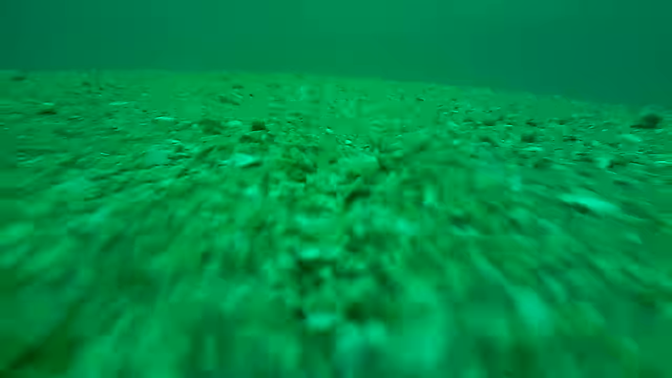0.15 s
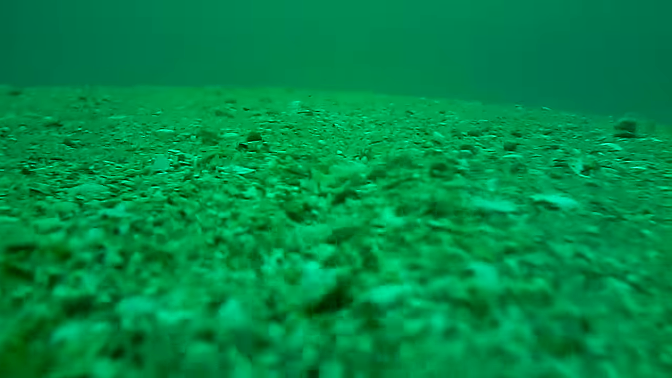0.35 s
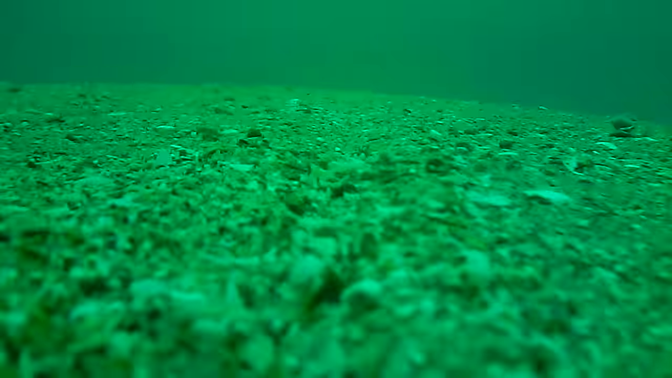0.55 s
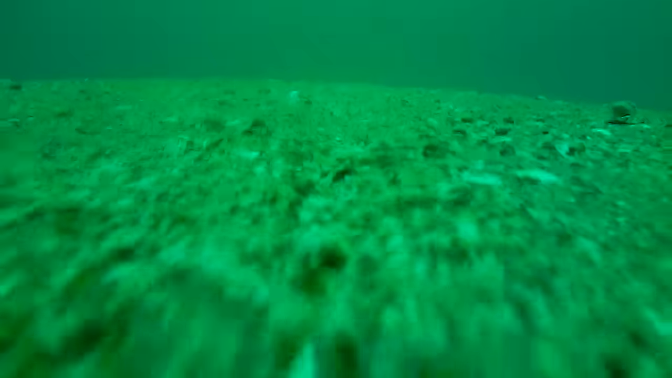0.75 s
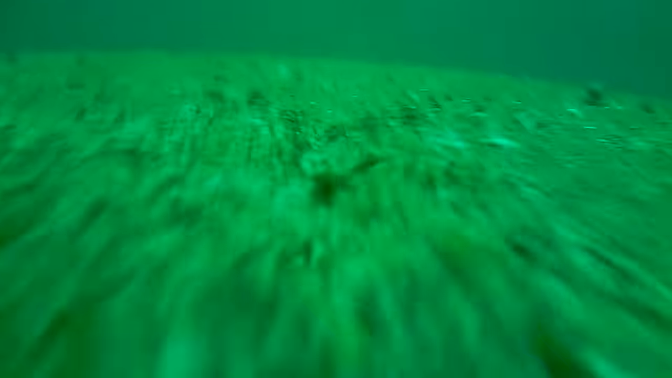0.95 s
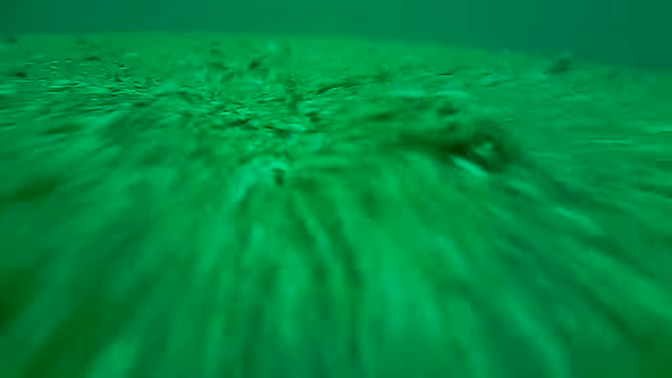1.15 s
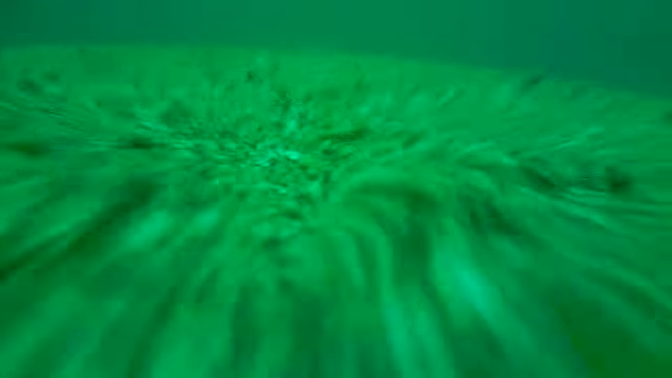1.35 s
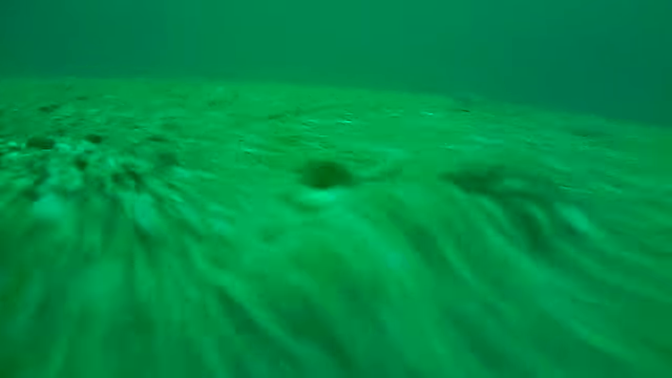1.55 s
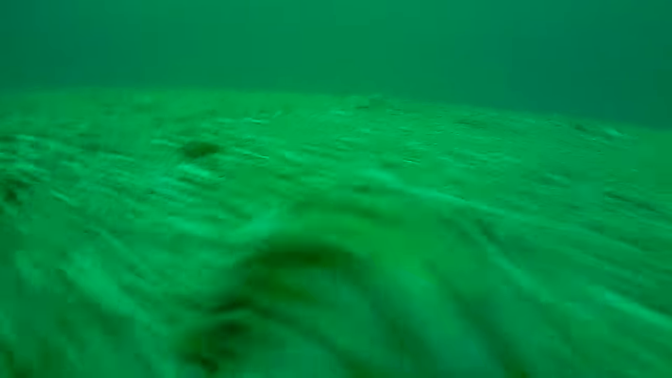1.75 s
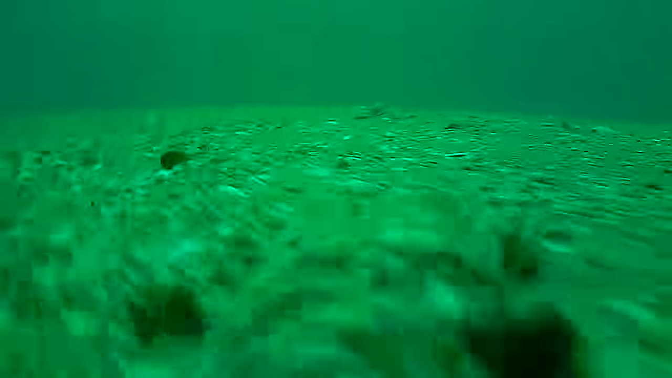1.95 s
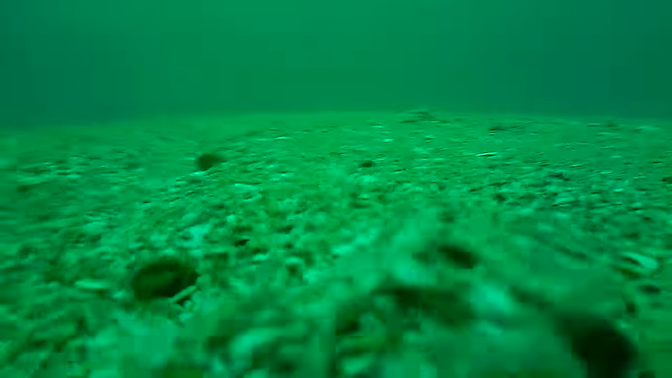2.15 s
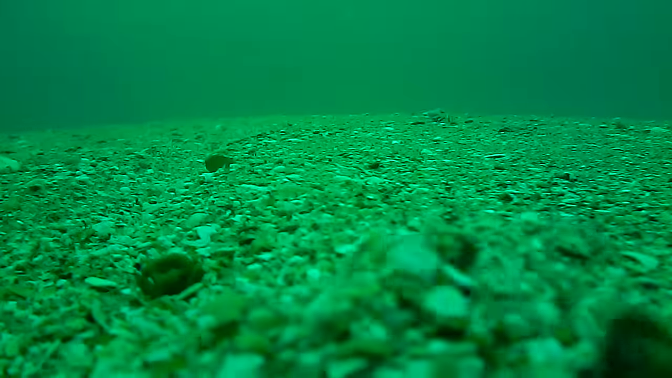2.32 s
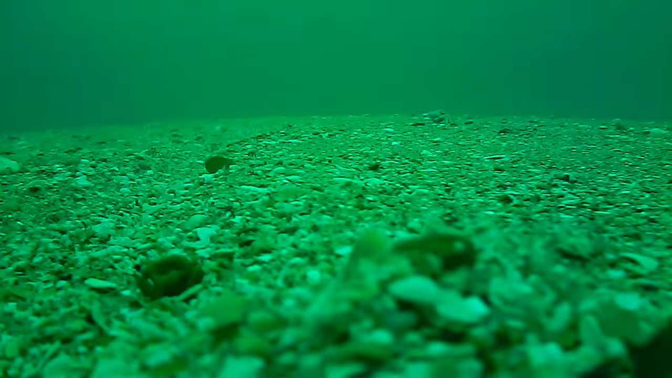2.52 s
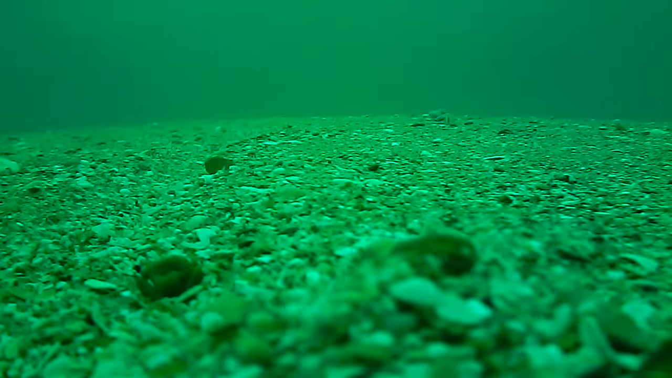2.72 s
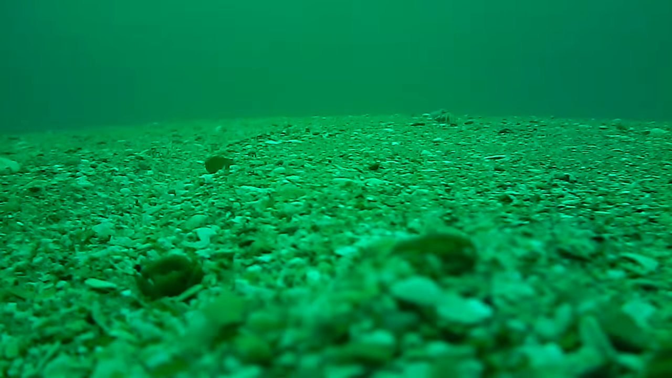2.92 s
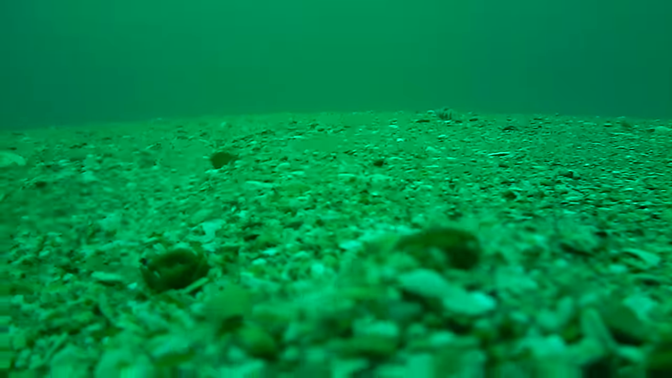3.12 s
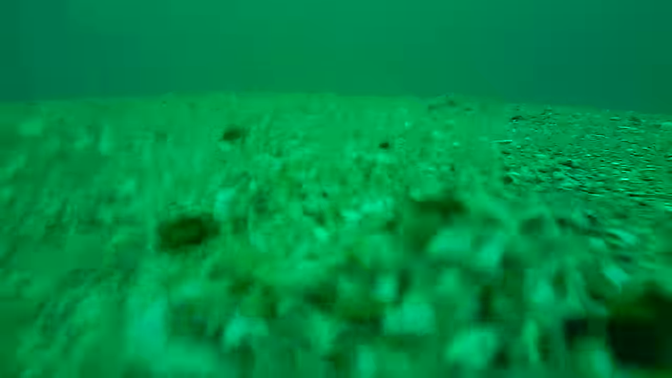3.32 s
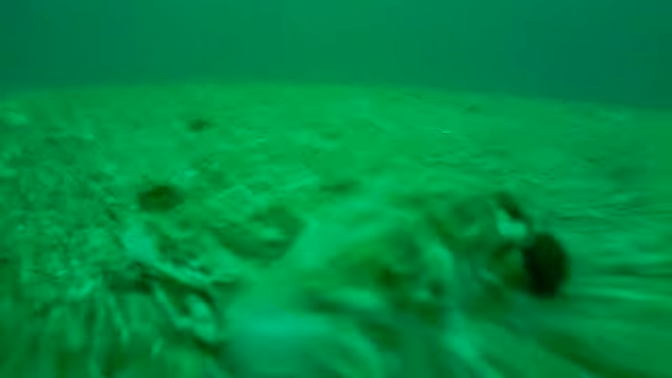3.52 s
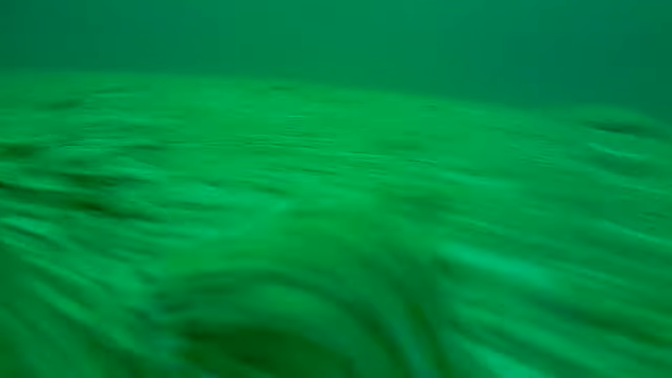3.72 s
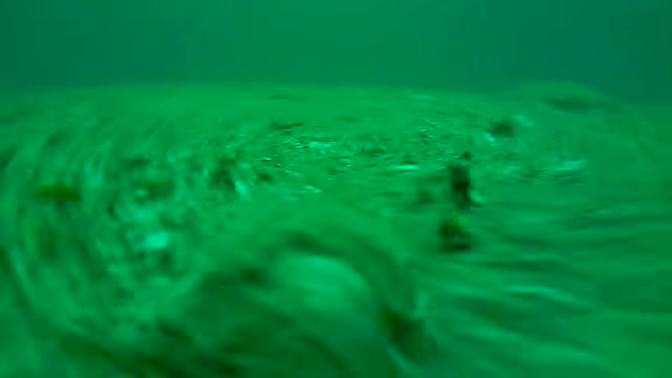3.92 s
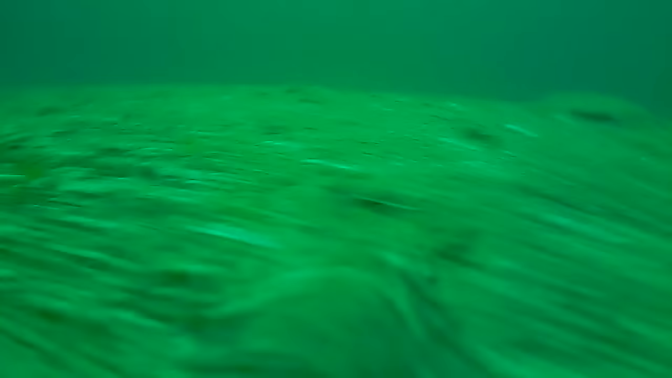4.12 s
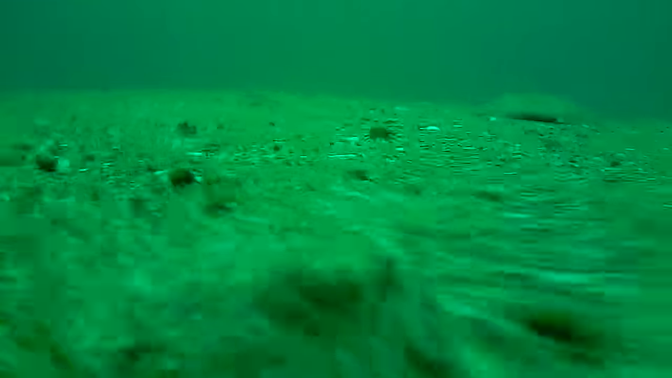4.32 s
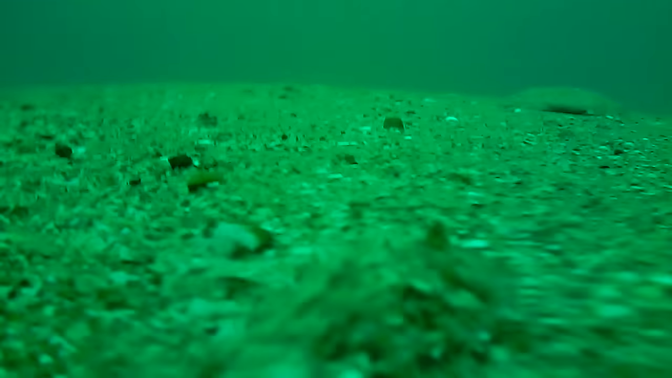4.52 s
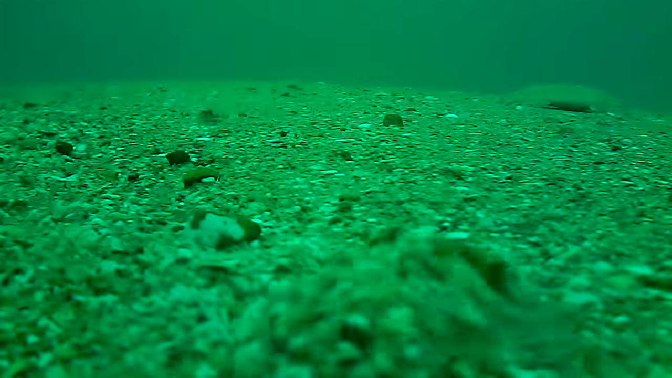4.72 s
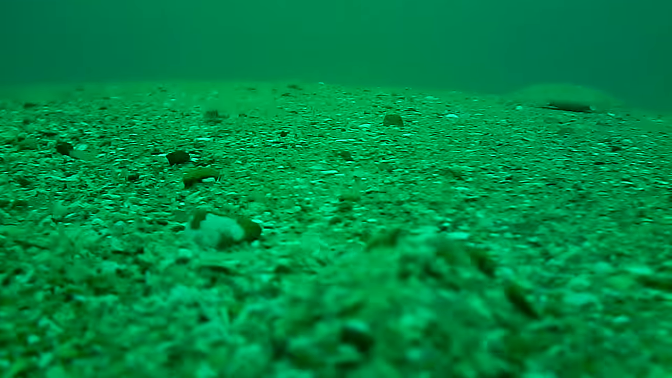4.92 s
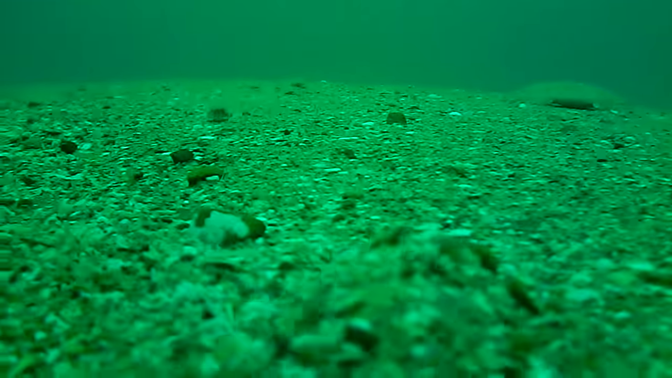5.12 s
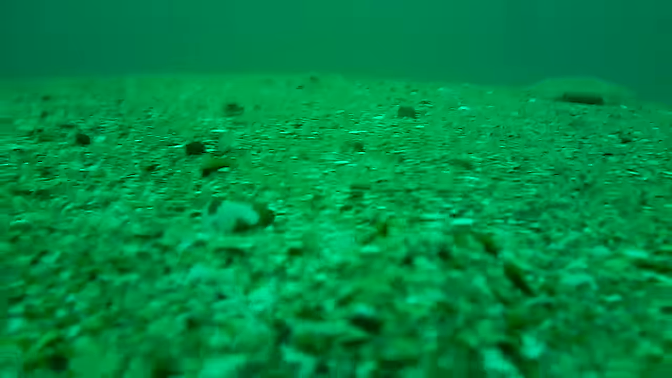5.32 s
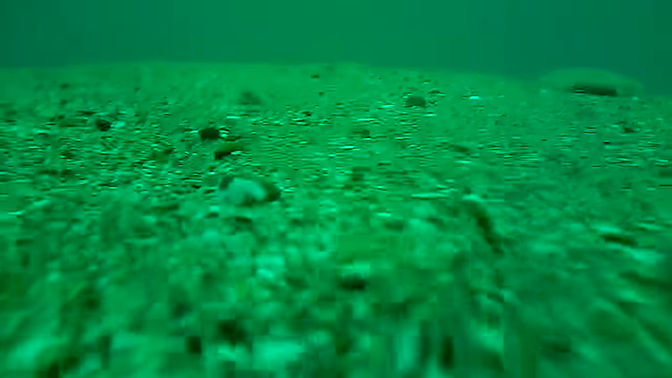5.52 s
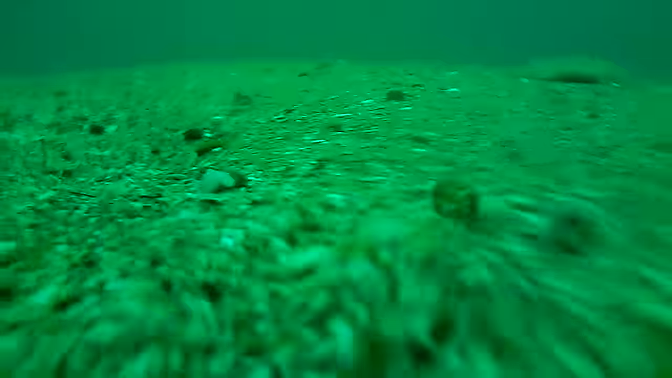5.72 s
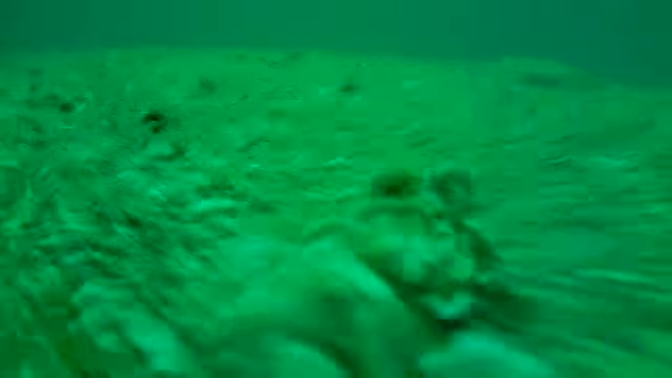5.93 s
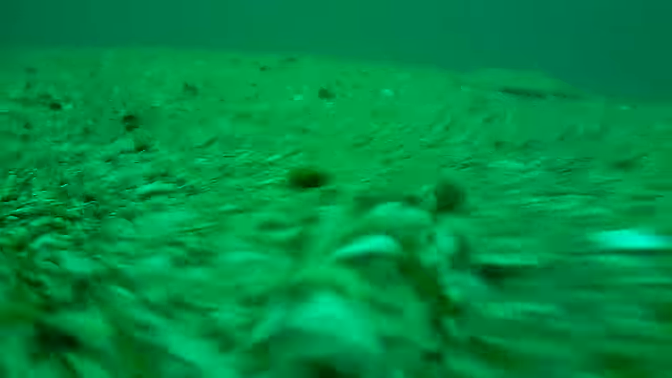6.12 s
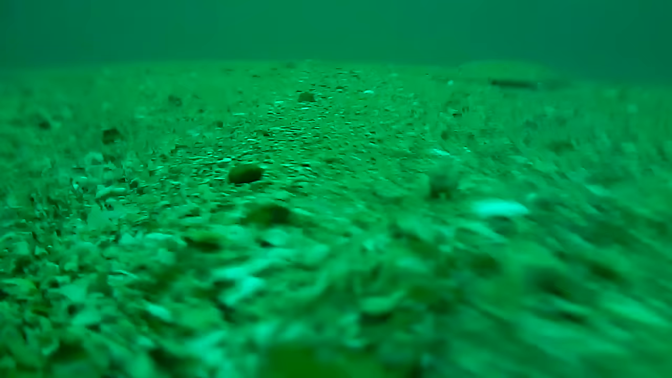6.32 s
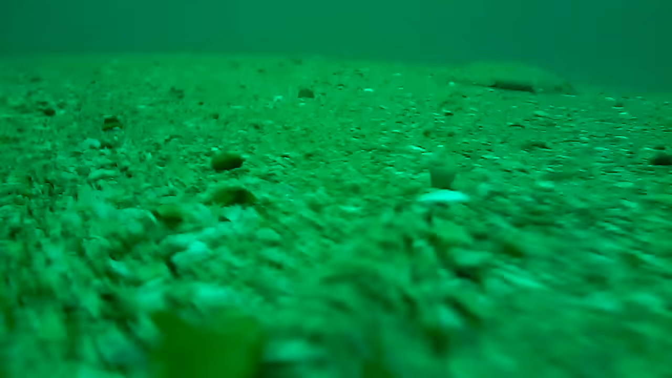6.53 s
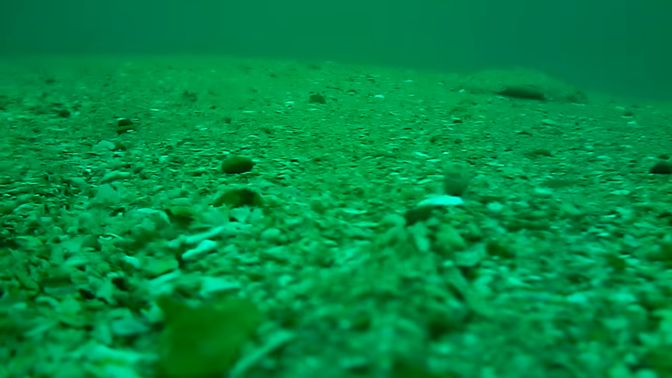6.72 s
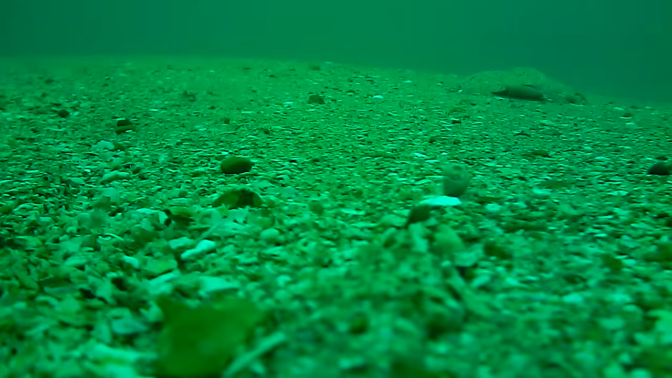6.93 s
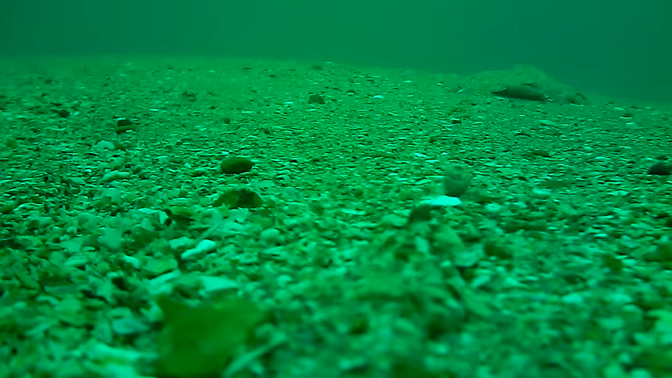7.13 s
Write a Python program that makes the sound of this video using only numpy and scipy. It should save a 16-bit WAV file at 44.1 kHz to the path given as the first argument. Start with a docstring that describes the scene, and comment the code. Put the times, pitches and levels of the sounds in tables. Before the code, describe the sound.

On a seabed, a hard waterproof case grinds over shingle and broken shell, heard from inside. A fading scrape opens, then a long crunchy surge, a quiet pause, a second rough surge with heavy bumps, another short pause, and a slightly softer drag. Pebbles clack, shell chips crack and grit hisses; the rests leave a low wavering drone, faint hiss and small ticks.

```python
"""Grinding is under way at once: a waterproof camera housing dragged over a seabed of shingle and shell.
Surges and short nudges, some overlapping, swell and ebb as powers of half a sine.
Random clicks of pebbles, shell and grit ring the case resonances; chips crack, stones clack, clumps crunch.
Larger stones judder and bump the case, as low-passed knocks and decaying sines.
In the pauses a wavering low drone, a faint hiss and a few settling ticks remain."""
import sys
import numpy as np
from scipy import signal
from scipy.fft import rfft, irfft, next_fast_len
from scipy.io import wavfile
from scipy.ndimage import uniform_filter1d

SR = 44100
rng = np.random.default_rng(int(sys.argv[2]) if len(sys.argv) > 2 else 0)


def int16_out(signal):
    """Quantize to a 16-bit WAV file."""
    q = np.round(np.clip(np.atleast_2d(signal).T, -1, 1) * 32767)
    wavfile.write(sys.argv[1], SR, q.astype(np.int16))


N = 320147
TIME = np.arange(N) / SR
FREQ = np.maximum(np.arange(N // 2 + 1) * SR / N, 1)


def undb(db):
    """Decibels to gain."""
    return np.exp(np.asarray(db) * (np.log(10) / 20))


def unit(x):
    """Scale to an rms of one."""
    return x / np.sqrt(np.mean(x ** 2) + 1e-18)


def band(x, lo_hz, hi_hz, order=2):
    """Butterworth band-pass."""
    edges_hz = [lo_hz, min(hi_hz, SR / 2 - 10)]
    return signal.sosfilt(signal.butter(order, edges_hz, "band", fs=SR, output="sos"), x)


def bell(f, hz, q):
    """Gain of a resonance, one at its centre; q of zero is flat."""
    return 1 / (1 + (q * (f / hz - hz / f)) ** 2)


def walk(rate_hz):
    """Smoothed random steps, unit rms, with rate_hz new values per second."""
    step = max(int(SR / rate_hz), 2)
    stairs = np.repeat(rng.standard_normal(N // step + 1), step)
    return unit(uniform_filter1d(stairs, step)[:N])


def noise(gain):
    """Noise of unit rms with the given gain at each frequency."""
    return unit(irfft(rfft(rng.standard_normal(N)) * gain, N))


def add(out, at_s, sound):
    """Mix a sound in at a time."""
    start = max(int(at_s * SR), 0)
    out[start:start + len(sound)] += sound[:N - start]


# The water shoves the case along, from rest to rest.
# Each row: start in seconds, end in seconds, grind at full speed in dB before the bed acts, exponent of
# the swell, fine grit in dB, broken shell in dB, extra knocking in dB.
SURGE_ROWS = [(-0.5, 0.48, -31.8, 2.3, 2.6, -3.2, -0.6), (-0.15, 0.78, -46.8, 1.05, 1.4, -1.8, -0.7),
              (0.51, 2.255, -31.7, 0.85, 2.9, -1.4, -1.6), (2.98, 3.42, -49.8, 1.25, 3.4, -1.4, -0.8),
              (3.215, 3.53, -35.2, 0.55, 1.1, 0.3, -3.2), (3.18, 4.705, -31, 0.88, 2.1, 0.1, 0.2),
              (5.0, 6.82, -35, 1.25, 3.1, 0.7, 1.4), (7.08, 7.4, -59.2, 1.05, -1.2, -0.7, 0.3)]


def sliding_db():
    """Speed follows half a sine per surge, grind a power of it; overlaps add power and blend colour."""
    power, colour = np.full(N, 1e-12), np.zeros((3, N))
    for start_s, end_s, db, steepness, *colour_db in SURGE_ROWS:
        moving = (TIME > start_s) & (TIME < end_s)
        speed = np.sin(np.pi * (TIME[moving] - start_s) / (end_s - start_s))
        share = (undb(db) * speed ** steepness) ** 2
        power[moving] += share
        colour[:, moving] += np.outer(colour_db, share)
    return 10 * np.log10(power), *(colour / power)


# Stretches of bed that the case ploughs through.
# Each row: middle in seconds, length in seconds, coarseness in dB (above 0 stones, below 0 fine grit).
BED_PATCHES = [(0.88, 0.3, -2.5), (1.85, 0.2, 3.2), (3.45, 0.6, -3.6), (3.87, 0.16, 6), (4.02, 0.3, 3.2),
               (4.5, 0.5, 2.7), (5.41, 0.2, 4.8), (5.62, 0.16, -3.2), (6.08, 0.2, 2.2), (6.64, 0.5, 4.2)]


def coarseness():
    """Coarseness of the bed in dB, easing into and out of each patch as a squared cosine."""
    total_db = np.zeros(N)
    for middle_s, length_s, db in BED_PATCHES:
        total_db += db * np.cos(np.pi * np.clip((TIME - middle_s) / length_s, -.5, .5)) ** 2
    return total_db


GRIT_DB_PER_LOAD_DB = 0.2863  # faster sliding breaks more fine grit
KNOCK_BASE_DB, KNOCK_DB_PER_LOAD_DB = -46.3, 0.4  # knocking grows more slowly than the grind
KNOCK_DB_PER_STONE_DB, GRIND_DB_PER_STONE_DB = 0.8, -0.2
BED_GRIND_DB, BED_GRIT_DB, BED_RATE_HZ = 0.5, 0.7, 22  # chance unevenness: rms spreads, changes per second


def drag_levels(brisk_db=-32):
    """Speed and bed set the grind, the grit and shell relative to it, and the knocking, all in dB."""
    slide_db, fine_db, broken_db, bumpy_db = sliding_db()
    load_db, stones_db = slide_db - brisk_db, coarseness()
    push_db = slide_db + GRIND_DB_PER_STONE_DB * stones_db + BED_GRIND_DB * walk(BED_RATE_HZ)
    grit_db = fine_db + GRIT_DB_PER_LOAD_DB * load_db - stones_db + BED_GRIT_DB * walk(BED_RATE_HZ)
    knock_db = KNOCK_BASE_DB + bumpy_db + KNOCK_DB_PER_LOAD_DB * load_db
    knock_db = knock_db + KNOCK_DB_PER_STONE_DB * np.maximum(stones_db, 0)
    return push_db, grit_db, broken_db, knock_db


# Resonances of the housing.
# Each row: centre in Hz, nominal width in Hz, level in dB.
CASE_MODES = [(473, 260, -13), (801, 130, 0.5), (1076, 190, -8), (1467, 312, -2), (2045, 215, -0.5),
              (2660, 500, -10.5), (3335, 340, -3.5), (3623, 270, -3.5), (5154, 450, -10.5),
              (6200, 2550, -14.5), (7700, 800, -6.5), (8850, 620, -8.5), (9900, 260, -11),
              (10750, 366, -5.5), (11660, 450, -15.5), (12400, 210, -13), (14500, 700, -26),
              (15300, 800, -15.5)]


def housing(hz=3000, q=0, size=2048, skirt=1.57, wall_db=-21):
    """Impulse response of the case to a click with its own pitch and sharpness."""
    f = np.maximum(np.arange(size // 2 + 1) * SR / size, 1)
    power = undb(wall_db) ** 2 * bell(f, 730, 0.24) ** 2  # the wall also passes sound directly
    for centre_hz, width_hz, db in CASE_MODES:
        power = power + undb(db) ** 2 * bell(f, centre_hz, 0.79 * centre_hz / width_hz) ** skirt
    cepstrum = irfft(np.log(np.sqrt(power) * bell(f, hz, q) + 1e-6))
    cepstrum[1:size // 2] *= 2  # minimum phase: sharp start, fading tail
    cepstrum[size // 2 + 1:] = 0
    return irfft(np.exp(rfft(cepstrum)))


def shifting_contact(x, depth_db=1.0, rate_hz=30):
    """The contact point wanders, so the bands around the case resonances swell and sink separately."""
    centres_hz = np.sort(np.array(CASE_MODES)[:, 0])
    padded = next_fast_len(N)
    spectrum = rfft(x, padded)
    freq = np.arange(len(spectrum)) * SR / padded
    out = np.zeros(N)
    for weights in np.eye(len(centres_hz)):
        part = irfft(spectrum * np.interp(freq, centres_hz, weights), padded)[:N]
        out += part * undb(depth_db * walk(rate_hz))
    return out


def clicks(rate_hz, spread_db):
    """Random contacts of either sign at a varying rate, with log-normal sizes capped above; unit rms."""
    count = len(rate_hz)
    share = np.clip(rate_hz / SR, 1e-4, 1)
    size = undb(spread_db * np.minimum(rng.standard_normal(count), 2.3)) * rng.choice([-1, 1], count)
    hit = rng.random(count) < share
    return unit(hit * size / np.sqrt(share))  # density leaves the mean power alone


def catches(rate_hz, release_s, limit=3):
    """Stones catch and let go: decaying jumps, soft-limited by what the loose bed can hold."""
    jumps = (rng.random(N) < rate_hz / SR) * np.sqrt(rng.exponential(size=N))
    stress = signal.lfilter([1], [1, -np.exp(-1 / (release_s * SR))], jumps)
    return unit(np.tanh(unit(stress - stress.mean()) / limit))


def grind(push_db, grit_db, broken_db):
    """Pebbles, shell and sand click in three bands; pushing adds contacts and slips modulate their level."""
    load_db = push_db + 32
    crowd = undb(.55 * load_db)
    slips = catches(rate_hz=170, release_s=0.0039)
    ring = housing()
    pebbles = clicks(3600 * crowd, spread_db=2) * undb(1.3 * slips + 0.55 * walk(60))
    pebbles = unit(band(signal.fftconvolve(pebbles, ring)[:N], 283, 2350, order=4))
    shell = clicks(4200 * crowd, spread_db=2.5) * undb(1.64 * slips)
    shell = unit(band(signal.fftconvolve(shell, ring)[:N], 2410, 5840, order=3))
    sand = clicks(6000 * crowd, spread_db=3.5) * undb(1.86 * slips + 0.69 * walk(90))
    sand = unit(band(signal.fftconvolve(sand, ring)[:N], 5900, 14700, order=3))
    # shell breaks under load; the finest grains follow the grit most strongly
    shell_db = broken_db + 0.64 * grit_db + 0.045 * load_db - 2.5
    sand_db = 1.17 * grit_db - 3.5
    mix = pebbles + undb(shell_db) * shell + undb(sand_db) * sand
    return undb(push_db) * shifting_contact(mix)


def crack(hz, q, rise_s=0.00023, splinter_s=0.001, size=176):
    """A chip splinters as a brief burst of random signs and rings the case; energy of unit rms over size."""
    age = TIME[:size]
    splinters = rng.choice([-1, 1], size) * (1 - np.exp(-age / rise_s)) * np.exp(-age / splinter_s)
    sound = signal.fftconvolve(splinters, housing(hz, q))
    return sound * np.sqrt(size / np.sum(sound ** 2))


def chips(push_db, grit_db, count=260, lo_hz=1200, hi_hz=11000, q=1.6, top_db=0, range_db=10):
    """Small chips crack at random times and pitches, as loud as the push; high ones follow the grit."""
    out = np.zeros(N)
    for when, fineness, weakness in rng.random((count, 3)):
        i = int(when * N)
        db = push_db[i] + fineness * grit_db[i] + top_db - range_db * weakness
        add(out, i / SR, undb(db) * crack(lo_hz * (hi_hz / lo_hz) ** fineness, q))
    return out


def loose_stones(push_db, count=320, lo_hz=800, hi_hz=4200, cycles=4, top_db=5.5, range_db=10, size=900):
    """Pebbles pushed aside clack together, each a sine decaying over a few cycles at its own pitch."""
    out, age = np.zeros(N), TIME[:size]
    for when, smallness, weakness in rng.random((count, 3)):
        i = int(when * N)
        hz = lo_hz * (hi_hz / lo_hz) ** smallness
        ring = np.sin(2 * np.pi * hz * age) * np.exp(-hz * age / cycles)
        add(out, i / SR, undb(push_db[i] + top_db - range_db * weakness) * ring)
    return out


def judder(knock_db):
    """Larger stones knock the whole case, and it rocks slowly over them: two bands of sparse clicks."""
    knocks = unit(band(clicks(np.full(N, 900), spread_db=3.5), 83, 543))
    rocking = unit(band(clicks(np.full(N, 300), spread_db=3), 7.1, 93.5))
    return undb(knock_db - 2.5) * knocks + undb(0.54 * knock_db - 20.5) * rocking


# Clumps giving way.
# Each row: start in seconds, length in seconds, level in dB before gain_db, centre in Hz.
CLUMPS = [(0.036, 0.012, -32, 1500), (0.768, 0.017, -31.5, 11000), (1.339, 0.037, -24.5, 11000),
          (1.359, 0.014, -21, 5860), (1.485, 0.041, -27, 2220), (1.768, 0.022, -28, 3400),
          (1.862, 0.032, -30, 3400), (1.975, 0.012, -30, 3400), (2.003, 0.0095, -25, 4000),
          (2.028, 0.035, -27.5, 3350), (3.191, 0.011, -30.5, 3100), (3.221, 0.0048, -25, 1120),
          (3.24, 0.008, -28, 3680), (3.451, 0.0083, -24, 11000), (3.622, 0.02, -23, 8000),
          (3.698, 0.027, -21.5, 6400), (3.909, 0.016, -27, 1090), (4.175, 0.035, -19.8, 1450),
          (4.246, 0.032, -23.5, 5370), (5.091, 0.012, -38.5, 1770), (5.144, 0.008, -41, 2600),
          (5.192, 0.022, -41, 1300), (5.899, 0.018, -29, 4500), (6.164, 0.0067, -26, 1400),
          (6.242, 0.037, -31, 5460), (6.492, 0.02, -35, 3300), (6.745, 0.045, -48.5, 700)]


def crunches(gain_db=-2.0, fade=0.43, q=0.23):
    """A clump collapses in a quick run of fractures that weakens slightly and rings the case."""
    out = np.zeros(N)
    for at_s, length_s, db, hz in CLUMPS:
        age = np.linspace(0, 1, max(int(length_s * SR), 20))
        run = clicks(np.full(len(age), 7000), spread_db=2.5) * np.exp(-fade * age)
        sound = signal.fftconvolve(run, housing(hz, q))
        add(out, at_s, sound * undb(db + gain_db) * np.sqrt(len(age) / np.sum(sound ** 2)))
    return out


# Single chips snapping or tapping the case, and ticks in the pauses.
# Each row: start in seconds, level in dB, centre in Hz, sharpness Q.
SINGLE_CHIPS = [(0.385, -47, 1310, 0.1), (0.4966, -43, 3650, 0.29), (0.8659, -28, 8000, 0.89),
                (1.3896, -27.5, 4750, 2.5), (1.3936, -17, 8500, 0.1), (1.7534, -23, 4100, 1.1),
                (2.0213, -31, 1310, 1.35), (2.069, -22.5, 7600, 5), (2.0817, -32, 11000, 0.2),
                (2.1139, -27, 7420, 0.1), (2.4516, -58, 950, 2.3), (2.835, -53, 1200, 1.1),
                (2.9493, -47, 4300, 0.9), (3.0496, -47, 700, 0.15), (4.2541, -23.5, 11000, 0.11),
                (4.317, -28, 2200, 0.5), (5.013, -55, 1000, 0.5), (5.049, -41.5, 2170, 0.35),
                (5.6529, -25.5, 5860, 0.1), (5.757, -28, 11000, 0.5), (6.1468, -21.5, 9000, 0.3),
                (6.2756, -28, 8500, 0.56), (6.3565, -29, 7500, 0.6), (6.98, -45.5, 1900, 1.2),
                (7.111, -52.5, 2000, 0.7), (7.176, -50, 900, 1.5)]


def snaps():
    """Each listed chip is one crack ringing the case."""
    out = np.zeros(N)
    for at_s, db, hz, q in SINGLE_CHIPS:
        add(out, at_s, crack(hz, q) * undb(db))
    return out


# The case bumping on larger stones.
# Each row: start in seconds, amplitude in dB before decay, frequency in Hz.
STONE_BUMPS = [(0.14, -32, 40), (3.3, -33, 45), (3.863, -33, 231), (4.255, -25.5, 90.4), (4.272, -27, 315),
               (4.285, -23.5, 167), (4.3, -29, 65), (5.795, -30, 131), (6.015, -33, 190), (6.42, -33, 200)]


def bumps(cycles=0.95, size=6000):
    """A heavy contact swings the case: a sine that decays within a cycle or two."""
    out, age = np.zeros(N), TIME[:size]
    for at_s, db, hz in STONE_BUMPS:
        add(out, at_s, undb(db) * np.sin(2 * np.pi * hz * age) * np.exp(-hz * age / cycles))
    return out


# Hiss spectrum of water and electronics at rest.
# Each row: frequency in Hz, relative density in dB per Hz.
HISS_SPECTRUM = [(20, -5), (110, -11.5), (160, -14.5), (300, -18.5), (600, -22.5), (800, -20.5),
                 (1300, -25.5), (2500, -28), (5000, -31), (15500, -32)]
HISS_RMS_DB = -59.5
# Low drone tones.
# Each row: centre in Hz, width of the pitch wander in Hz, rms level in dB before its wavering.
DRONE_TONES = [(62, 9, -63.5), (84, 9, -65)]


def still_water():
    """Steady shaped noise over drone sines that waver in pitch and level."""
    hz, db = np.transpose(HISS_SPECTRUM)
    out = undb(HISS_RMS_DB) * noise(undb(np.interp(np.log(FREQ), np.log(hz), db)))
    for centre_hz, width_hz, level_db in DRONE_TONES:
        level = undb(level_db + walk(26))
        pitch_hz = centre_hz + width_hz / 2 * walk(22)
        out += level * unit(np.sin(2 * np.pi * np.cumsum(pitch_hz) / SR))
    return out


def scene():
    """Everything reaches the one microphone through the case."""
    push_db, grit_db, broken_db, knock_db = drag_levels()
    sliding = 1 / (1 + np.exp(-(push_db + 64.5) / 2))  # under a light push the case sticks and falls silent
    drag = grind(push_db, grit_db, broken_db) + chips(push_db, grit_db)
    drag = drag + loose_stones(push_db) + judder(knock_db)
    return (sliding * drag + crunches() + snaps() + bumps() + still_water())[None]


def record(dry):
    """The camera cuts the top with a steep low-pass; its converter sits slightly off zero."""
    top_hz, offset = 15850, -.0026
    return signal.sosfilt(signal.ellip(10, .2, 70, top_hz, fs=SR, output="sos"), dry) + offset


dry = scene()
out = record(dry)
int16_out(out)
```